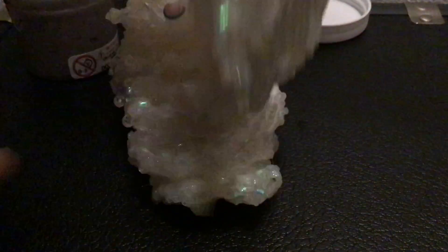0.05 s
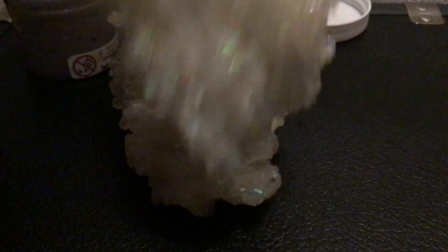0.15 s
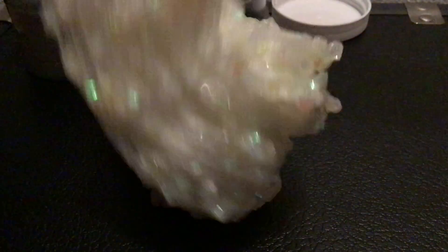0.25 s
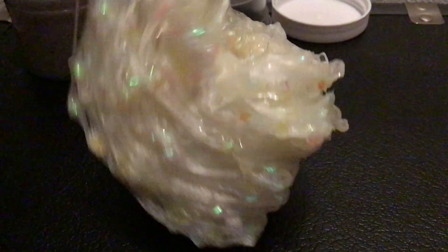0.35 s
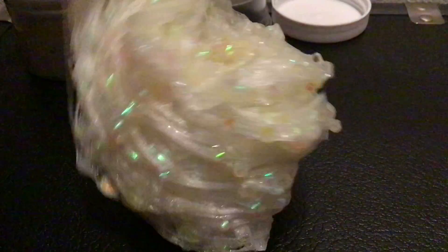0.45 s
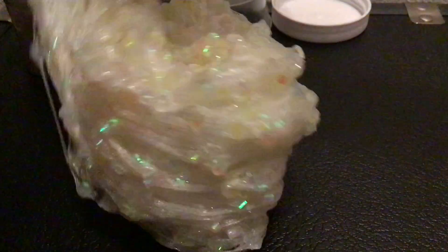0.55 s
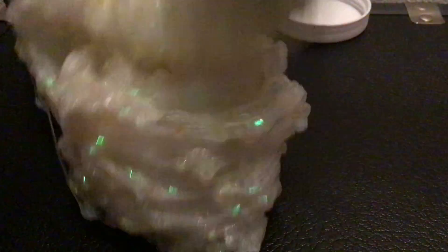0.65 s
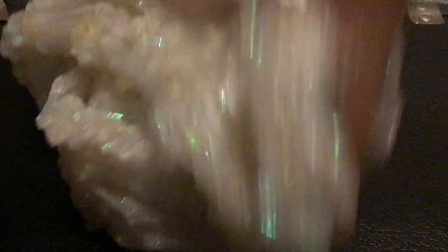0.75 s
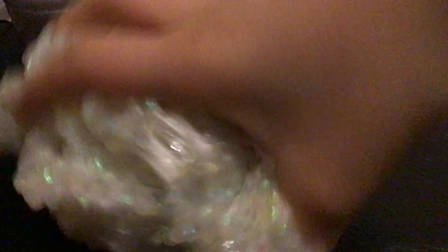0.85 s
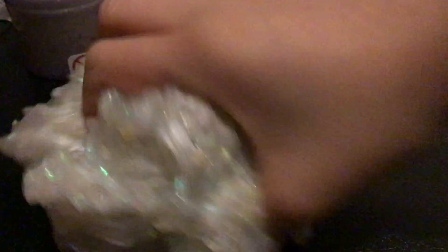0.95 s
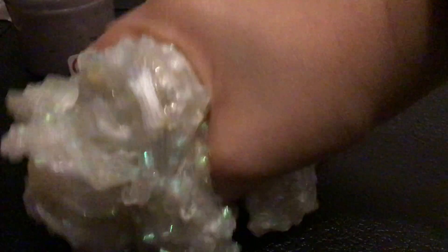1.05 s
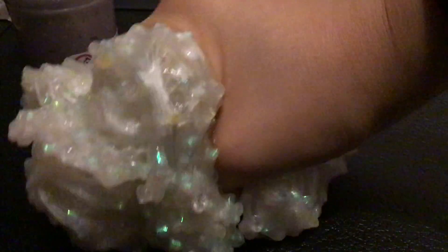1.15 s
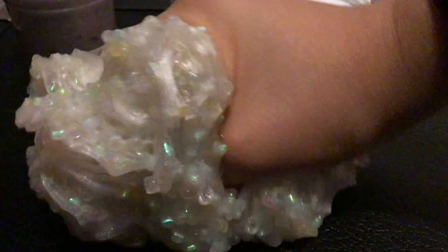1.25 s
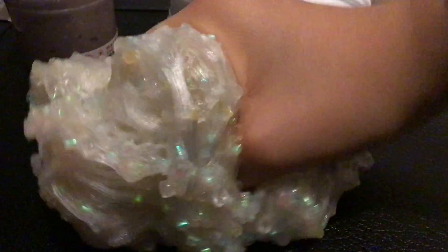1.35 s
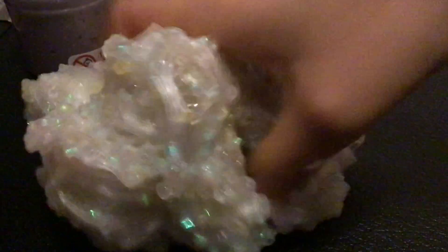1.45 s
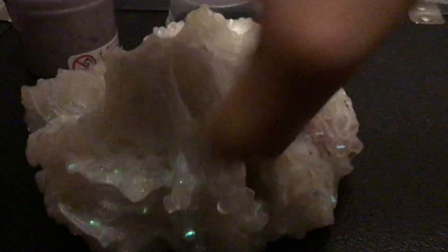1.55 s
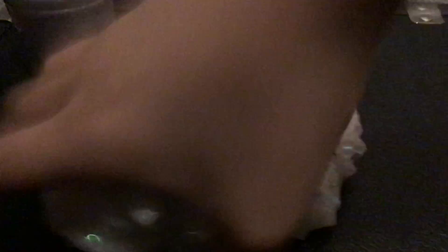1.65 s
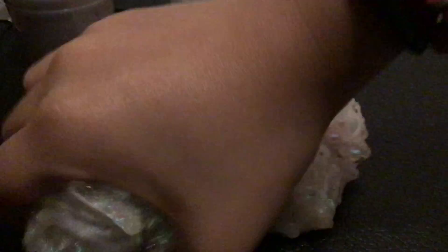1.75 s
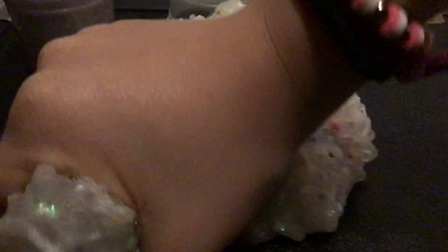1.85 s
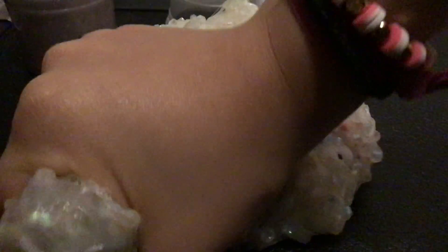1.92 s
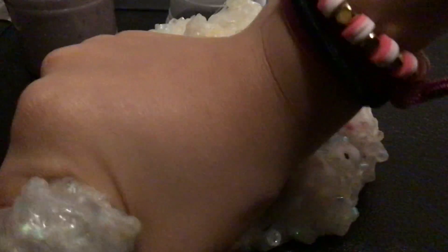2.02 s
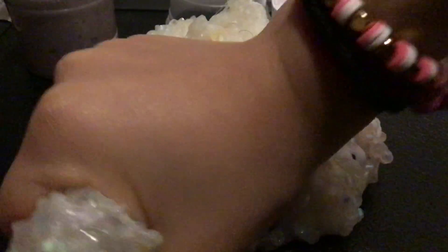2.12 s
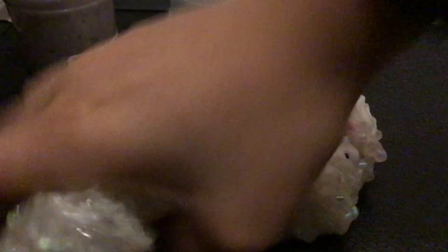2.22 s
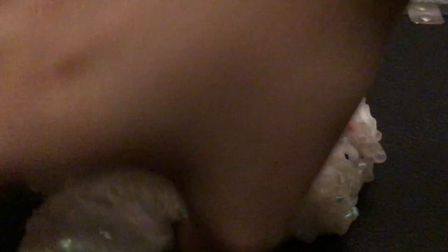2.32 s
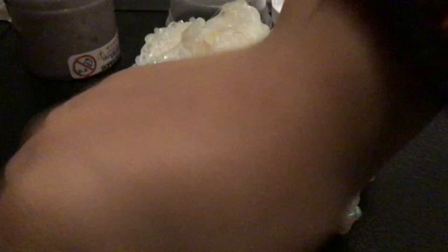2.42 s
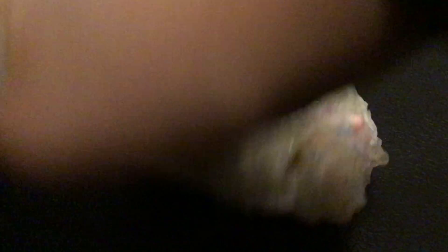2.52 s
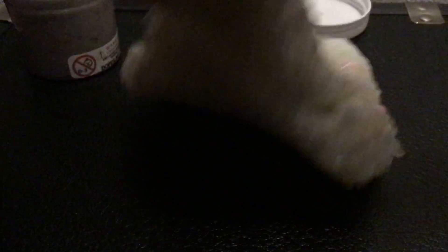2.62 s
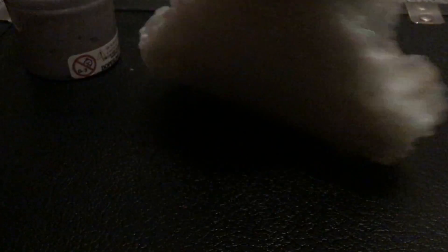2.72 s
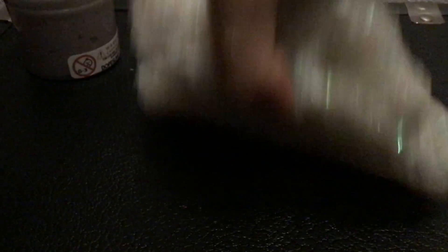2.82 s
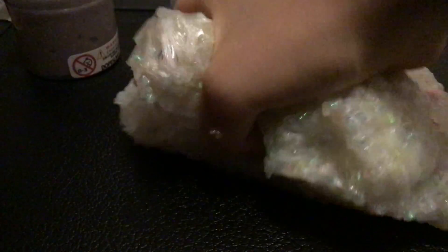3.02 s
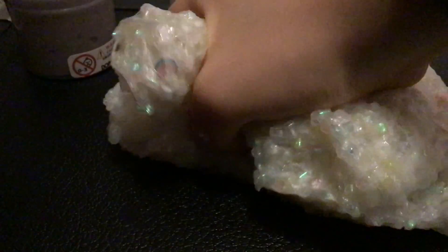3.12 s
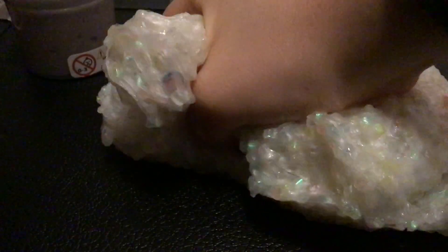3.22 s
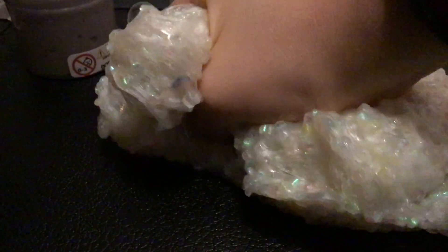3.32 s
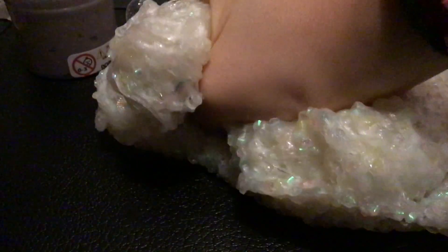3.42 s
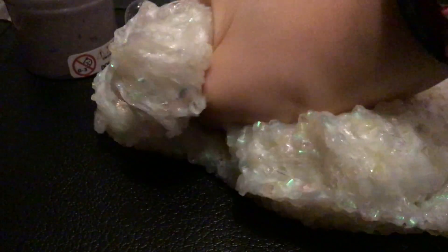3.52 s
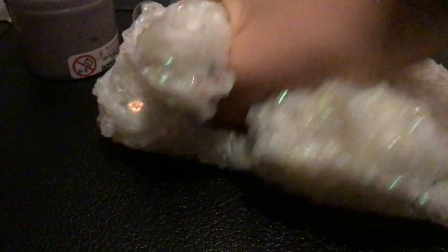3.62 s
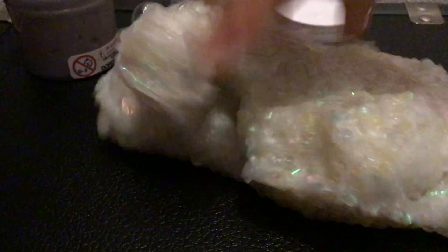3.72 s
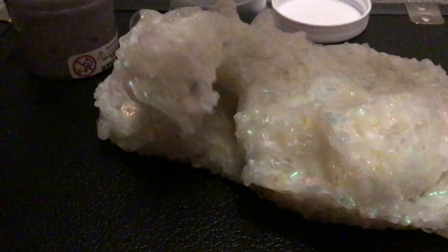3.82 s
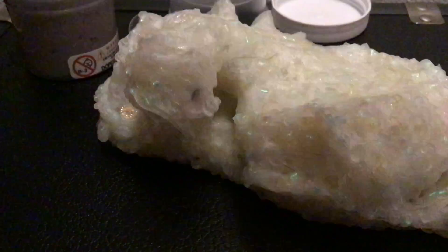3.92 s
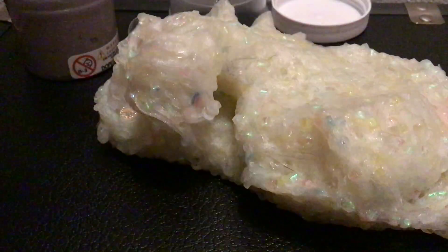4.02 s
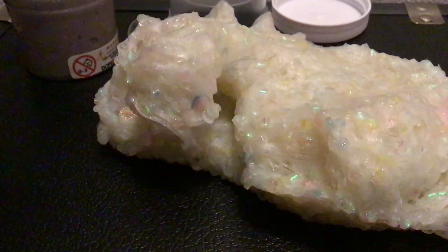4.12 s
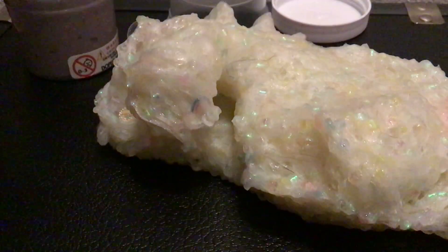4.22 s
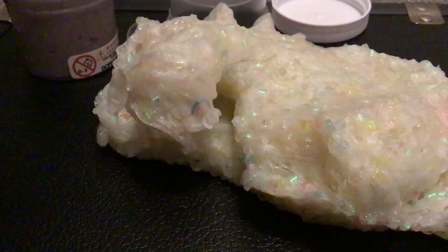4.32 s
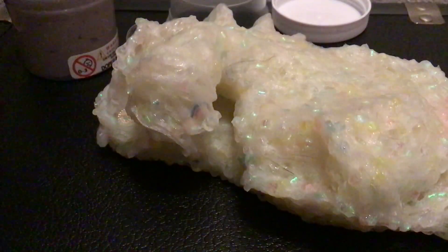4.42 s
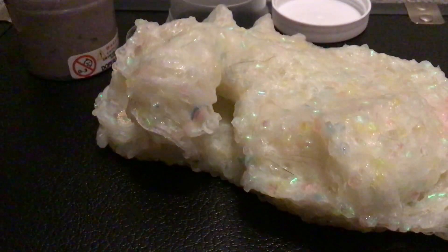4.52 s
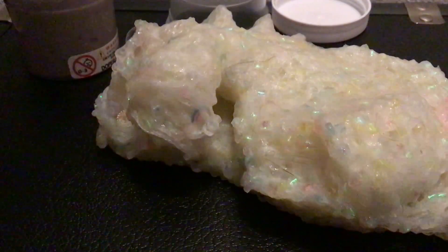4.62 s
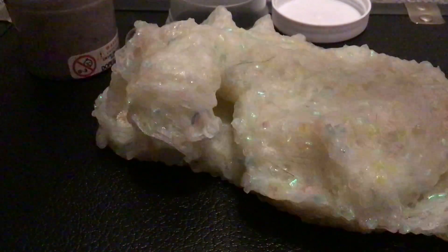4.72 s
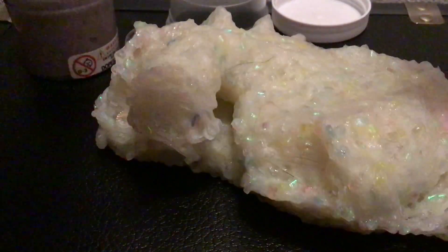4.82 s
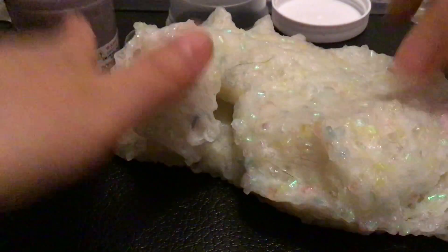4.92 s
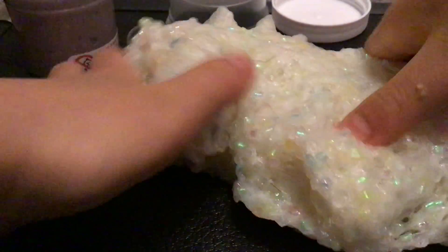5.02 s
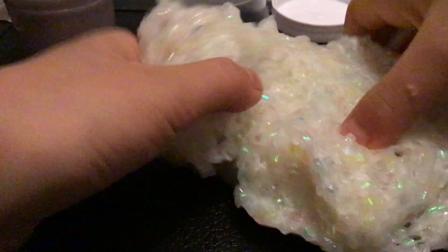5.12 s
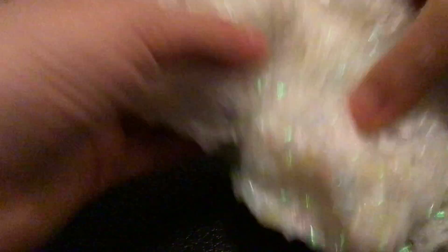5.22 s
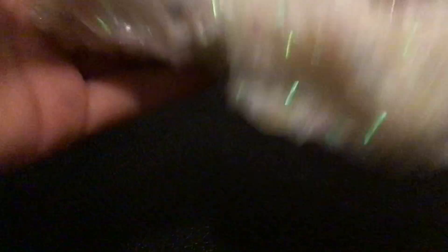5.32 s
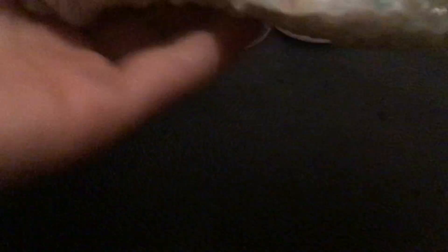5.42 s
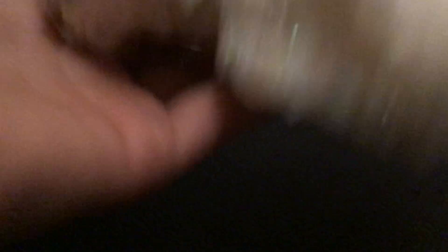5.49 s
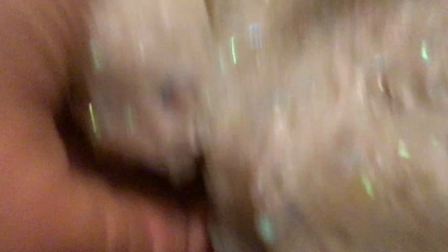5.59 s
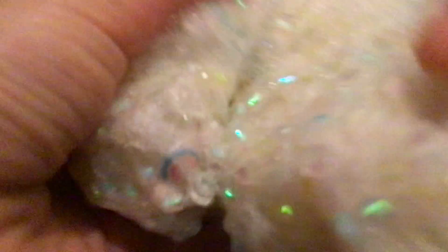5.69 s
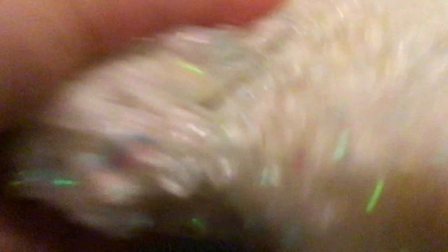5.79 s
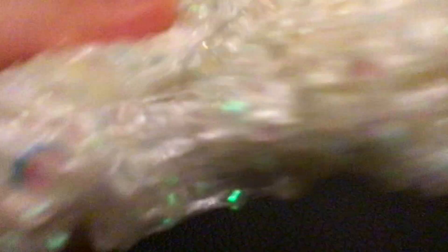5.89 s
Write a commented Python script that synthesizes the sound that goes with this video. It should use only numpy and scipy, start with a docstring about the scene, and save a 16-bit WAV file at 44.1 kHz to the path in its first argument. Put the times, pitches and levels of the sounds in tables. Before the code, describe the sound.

Hands work bead-filled slime on a table, very near the microphone. A few faint ticks lead to two strong bursts of popping and crackling with hard thumps, then another slap and thinning crackles. A short scuffing knock ends the pressing; the slime rests almost silently, then soft thumps and scattered bright pops return. Little room sound, steady low hum.

```python
"""A bead-filled slime is kneaded by hand on a table top, close to a phone microphone.
Its air pockets pop as coloured noise bursts; tearing films and tiny bubbles crackle as spiky filtered noise.
Slides hiss as denser noise, and small ringing bubbles and leaking air are short sines.
Slaps thud as tones gliding down, since the table's bending waves arrive treble first; presses and slides
drive its resonances with noise. A short room answer follows the slime, over a quiet, steady room hum."""
import sys
import numpy as np
from scipy import signal
from scipy.fft import rfft, irfft, next_fast_len
from scipy.io import wavfile

SR = 44100
rng = np.random.default_rng(int(sys.argv[2]) if len(sys.argv) > 2 else 0)


def unload_wav(signal):
    """Save mono or channel-first audio to the path in sys.argv[1] as 16-bit WAV at rate SR, clipped to [-1, 1]."""
    wavfile.write(
        sys.argv[1],
        SR,
        np.round(np.clip(np.atleast_2d(signal).T, -1, 1) * 32767).astype(np.int16),
    )


N = 262395  # length [samples]


def amp(db):
    """A level in dB as a linear gain."""
    return 10 ** (np.asarray(db) / 20)


def unit(x):
    """The signal scaled to rms 1."""
    return x / np.sqrt(np.mean(x ** 2) + 1e-20)


def along(points, hz):
    """A curve through (frequency, value) points, straight on a log frequency axis."""
    f, v = np.transpose(points)
    return np.interp(np.log(hz + 1), np.log(f + 1), v)


def filtered(x, response):
    """The signal shaped by a complex response of frequency."""
    size = next_fast_len(N + SR // 2)  # room for ringing past the end
    spectrum = rfft(x, size) * response(np.fft.rfftfreq(size, 1 / SR))
    return irfft(spectrum, size)[..., :N]


def modes(rows):
    """The causal response of a few resonances, added with alternating sign."""
    def response(f):
        total = 0
        for k, (centre, width, db) in enumerate(rows):
            damping = 1j * f * width
            total = total + (-1) ** k * amp(db) * damping / (centre * centre - f * f + damping)
        return total
    return response


def spiky(count, spread_db, life):
    """Noise of rms 1 made of overlapping bursts of scattered size, each decaying by 1/e in life [s]."""
    sizes = np.clip(rng.standard_normal(count), -3, 2)
    starts = np.bincount(rng.integers(N, size=count), amp(spread_db * sizes), N)
    envelope = signal.lfilter([1], [1, -np.exp(-1 / (life * SR))], starts)
    return unit(envelope * rng.standard_normal(N))


# Colour of the room hum: (frequency [Hz], relative level per Hz [dB])
HUM_COLOUR = [(15, -43.5), (25, -5.5), (53, 8.5), (82, 5.5), (270, -17.5), (405, -23), (641, -20.5),
              (863, -35), (1190, -36), (2480, -31.5), (3920, -41), (5140, -32.5), (6560, -39.5),
              (14800, -47.5), (16000, -44)]
HUM_DB = -59.5  # rms level


def hum():
    """The steady background of the room: noise of a fixed colour."""
    noise = filtered(rng.standard_normal(N), lambda hz: amp(along(HUM_COLOUR, hz)))
    return amp(HUM_DB) * unit(noise)


# Decay of the room: (frequency [Hz], time to fall 60 dB [s])
ROOM_DECAY = [(200, 0.055), (2000, 0.04), (12000, 0.031)]


def room(x):
    """A short answer from nearby surfaces: a noise tail in which each frequency dies at its own speed."""
    hz, t, z = signal.stft(rng.standard_normal(SR // 4), SR, nperseg=128)
    decay = amp(-60 * t / along(ROOM_DECAY, hz)[:, None])
    tail = signal.istft(z * decay, SR, nperseg=128)[1]
    late = np.pad(x, (60, 0))  # delay [samples]
    return signal.fftconvolve(late, tail / np.linalg.norm(tail))[:N]


# Strength of the kneading: (time [s], crackle level [dB], its treble against it [dB],
# push on the table [dB], rubbing against the push [dB])
KNEADING = [(0, -90, -23, -60, -8), (.12, -75, -13, -65, -8), (.35, -79, -14, -70.5, -11.5),
            (.77, -78.5, -20.5, -74, -12), (.86, -65, -27, -74, -9), (.95, -48.5, -21, -36.5, -7),
            (1.03, -47, -13, -47.5, -24), (1.08, -43.5, -7.5, -46.5, 1.5), (1.14, -48.5, -5.5, -48, -16),
            (1.24, -52, -3, -54.5, -12), (1.3, -61.5, -6, -59.5, -8), (1.38, -71.5, -4.5, -70, -3),
            (1.48, -52, -9.5, -58, -19), (1.6, -94, -6, -50, -16), (1.68, -85.5, -6, -65, -18),
            (1.72, -48, -7.5, -47.5, -5), (1.77, -40.5, -19, -34.5, -7.5), (1.84, -45.5, 1, -49, -11),
            (1.9, -44.5, 3.5, -47, -11), (2.0, -48, 2.5, -53.5, -3), (2.1, -60, -4.5, -74.5, 0),
            (2.21, -70, -9, -83, 2), (2.284, -47, -13.5, -41, -8), (2.42, -82, -12.5, -59.5, -27),
            (2.476, -40.5, -17, -39, -24), (2.55, -45.5, -10, -45, -14), (2.63, -58, 0, -64.5, -4),
            (2.84, -62.5, -6, -68.5, -7), (2.92, -53.5, -7.5, -51, -22), (3.08, -51.5, -4.5, -51.5, -8),
            (3.23, -53.5, 0, -55, -21), (3.35, -57, 1.5, -50, -21), (3.49, -60.5, -13, -61.5, -10.5),
            (3.62, -80, -2, -65, -19), (3.75, -60.5, -5.5, -52, -13), (3.85, -83, -3, -69, -18),
            (4.2, -83, -5, -75, -12), (4.7, -78, -0.5, -70, -14), (4.88, -94, -8, -74, -16),
            (5.04, -68.5, -21.5, -71, -11), (5.17, -54, -15, -50, -16), (5.25, -47.5, -11, -52, -23),
            (5.34, -69.5, 2, -64.5, -8), (5.6, -67.5, 4.5, -69, -6), (5.82, -63, -3, -68, 0.5),
            (5.95, -59, 7, -59, 2)]
CRACKLE, TREBLE, PUSH, RUB = 1, 2, 3, 4  # columns


def kneading(column):
    """How hard the hands work: one column of the kneading as a gain for every sample."""
    rows = np.array(KNEADING)
    return amp(np.interp(np.arange(N) / SR, rows[:, 0], rows[:, column]))


# Drags of the slime and slides of a hand: (start [s], full [s], stop [s], fade [s], hiss level [dB],
# treble hiss level [dB], rumble level [dB], knocking level [dB], rubbing level [dB])
SLIDE_MOVES = [(-.05, 0, 0.047, 0.052, -63.5, -71.5, -69, -53, -51.5),
               (1.402, 1.5, 1.56, 0.028, -50, -54.5, -35.5, -41.5, -55),
               (2.225, 2.253, 2.325, 0.036, -47, -56, -36.5, -43, -55),
               (2.67, 2.7, 2.74, .04, -61.5, -61.5, -75, -74, -61),
               (3.653, 3.698, 3.772, 0.056, -48, -50.5, -29.5, -40.5, -57.5),
               (4.272, 4.391, 4.51, 0.071, -73, -69, -66, -77, -86),
               (4.924, 4.945, 5.02, 0.023, -73, -126, -68, -56, -57),
               (5.077, 5.155, 5.14, 0.031, -53, -67.5, -35, -40.5, -76),
               (5.19, 5.231, 5.31, 0.02, -51, -57.5, -30.5, -37, -57),
               (5.843, 5.915, 5.95, .03, -50, -46, -67, -59, -51.5)]
HISS, TREBLE_HISS, KNOCKING, RUBBING = 4, 5, 7, 8  # columns
TOUCH_S = 0.012  # contact is made within this time
START_UNDER_DB, FADE_DB = 15.5, 28.5  # swell from this far below full; loss over one fade time


def sliding(column):
    """Each slide touches, swells, holds and fades: one level column as a gain."""
    t, gain = np.arange(N) / SR, np.zeros(N)
    for row in SLIDE_MOVES:
        start, full, stop, fade = row[:4]
        swell_db = START_UNDER_DB * np.minimum(t - full, 0) / max(full - start, 0.005)
        fade_db = FADE_DB * np.maximum(t - stop, 0) / fade
        touch = np.clip((t - start) / TOUCH_S, 0, 1)
        gain += touch * amp(row[column] + swell_db - fade_db)
    return gain


RUMBLE_UNDER_DB, RUMBLE_T60 = 23.5, 0.32  # start below full [dB]; time to fall 60 dB after the stop [s]


def rumbling():
    """The table's lowest mode builds up until a slide stops, then rings out: its level as a gain."""
    t, gain = np.arange(N) / SR, np.zeros(N)
    for start, full, stop, fade, hiss_db, treble_db, db, *_ in SLIDE_MOVES:
        build_db = RUMBLE_UNDER_DB * np.minimum(t - stop, 0) / (stop - start)
        ring_db = 60 * np.maximum(t - stop, 0) / RUMBLE_T60
        gain += amp(db + build_db - ring_db) * (t > start)
    return gain


# Table modes, lowest first: (centre [Hz], width [Hz], relative level [dB])
# The lowest and the top one are levelled alone, so only the middle two balance by the last column.
TABLE_MODES = [(67.5, 19, 0), (147.9, 44, 0.5), (283, 150, -3.5), (607, 310, 0)]
RUMBLE_DB = -2.5  # lowest mode against the knocking, while kneading


def table():
    """Drags and presses jolt the table: its lowest mode rumbles, the next knock, the top answers rubbing."""
    lowest, middle, top = modes(TABLE_MODES[:1]), modes(TABLE_MODES[1:3]), modes(TABLE_MODES[3:])
    rumble = filtered(spiky(count=1500, spread_db=0.5, life=0.0079), lambda hz: lowest(hz) ** 2)
    knock = filtered(spiky(count=2000, spread_db=1.5, life=0.00098),
                     lambda hz: middle(hz) / (1 + 1j * hz / 400) ** 2)  # softened above 400 Hz
    rub = filtered(spiky(count=12000, spread_db=1.5, life=0.0017), lambda hz: top(hz) ** 2)
    push = kneading(PUSH)
    # pushes and slides add their power
    rumble_gain = np.hypot(amp(RUMBLE_DB) * push, rumbling())
    knock_gain = np.hypot(push, sliding(KNOCKING))
    rub_gain = np.hypot(kneading(RUB) * push, sliding(RUBBING))
    return rumble_gain * unit(rumble) + knock_gain * unit(knock) + rub_gain * unit(rub)


# Slaps on the table: (time [s], level before the rise [dB], first pitch [Hz], last pitch [Hz],
# glide time constant [s], time to fall 60 dB [s])
SLAPS = [(0.94, -11, 412, 66, 0.0037, 0.13), (0.9546, -21.5, 370, 67.4, 0.014, 0.042),
         (1.08, -22.5, 310, 100, 0.0073, 0.031), (1.608, -29, 338, 70, 0.005, 0.1),
         (1.735, -6, 154, 89, 0.017, 0.047), (1.9075, -20, 317, 82, 0.0035, 0.055),
         (1.9605, -7, 528, 65, 0.0016, 0.07), (2.461, -7, 860, 100, 0.0017, 0.04),
         (2.4705, -12, 253, 80, 0.015, 0.029), (2.479, -21.5, 305, 80, 0.0087, 0.065),
         (2.5617, -10, 550, 64, .0022, .07), (2.899, -38.5, 242, 90, .015, 0.157),
         (3.701, -28, 300, 97, 0.009, .18), (3.802, -26, 235, 66.8, .0058, 0.2),
         (5.048, -26.5, 224, 71, 0.0084, 0.38), (5.155, -21.5, 214, 86, 0.014, 0.11),
         (5.238, -27.5, 272, 117.5, 0.017, 0.18)]
RISE_CYCLES = 0.45  # rise time constant, in cycles of the first pitch


def thuds():
    """Bending waves in the table: high ones travel faster, so each slap is a sine gliding down."""
    out, t = np.zeros(N + SR), np.arange(SR // 4) / SR
    for s, db, first_hz, last_hz, glide, t60 in SLAPS:
        turns = last_hz * t + (first_hz - last_hz) * glide * (1 - np.exp(-t / glide))
        rise = 1 - np.exp(-t * first_hz / RISE_CYCLES)
        thud = amp(db - 60 * t / t60) * rise * np.sin(2 * np.pi * turns)
        out[round(s * SR):][:len(t)] -= thud
    return out[:N]


# Colour of tiny bubbles and treble hiss: (frequency [Hz], relative level per Hz [dB])
FIZZ_COLOUR = [(2500, -37), (5000, 2.5), (8000, 1.5), (12000, -2.5), (16000, -3), (18000, -2.5)]


def fizzy(x):
    """The bright colour shared by the fizzing bubbles and the treble of the slides."""
    return unit(filtered(x, lambda hz: amp(along(FIZZ_COLOUR, hz))))


# Colour of the sliding hiss: (frequency [Hz], relative level per Hz [dB])
SCUFF_COLOUR = [(530, -57), (900, -2.5), (2600, 0), (3640, -6.5), (4970, -5.5), (6480, -36), (8000, -21),
                (10400, -10), (17600, -120)]


def slides():
    """Sliding contact is a dense, nearly smooth hiss that fades fast when the grip holds."""
    def grit():
        return spiky(count=20000, spread_db=2.5, life=0.00028)
    hiss = unit(filtered(grit(), lambda hz: amp(along(SCUFF_COLOUR, hz))))
    return sliding(HISS) * hiss + sliding(TREBLE_HISS) * fizzy(grit())


# Ringing bubbles and faint squeaks of air leaking from the resting slime: (time [s],
# level before the rise [dB], pitch [Hz], rise time constant [s], time to fall 60 dB [s])
SMALL_TONES = [(2.0175, -26, 4000, 0.0004, .012), (3.574, -36, 2550, 0.00059, 0.016),
               (3.925, -62, 5250, 0.022, 0.12), (3.955, -78, 6800, 0.023, .1),
               (3.986, -63, 6050, 0.018, .12), (4.01, -69, 6800, 0.022, 0.14),
               (4.056, -66, 6900, 0.023, 0.1), (4.07, -72.5, 5000, 0.018, 0.095),
               (4.086, -73.5, 7150, 0.011, 0.056), (4.1, -68, 4600, .015, 0.14),
               (4.105, -72, 7800, 0.01, .07), (4.16, -69, 4550, 0.014, .12), (4.17, -63, 5050, .015, 0.087),
               (4.301, -64, 2950, 0.02, 0.14)]


def tones():
    """Ringing bubbles and leaking air: short sines whose pitch drifts a little."""
    out, t = np.zeros(N + SR), np.arange(SR // 8) / SR
    for s, db, hz, rise, t60 in SMALL_TONES:
        drift = np.cumsum(rng.standard_normal(len(t))) * 0.08  # wandering phase [rad]
        envelope = amp(db - 60 * t / t60) * (1 - np.exp(-t / rise))
        out[round(s * SR):][:len(t)] += envelope * np.sin(2 * np.pi * hz * t + drift)
    return out[:N]


# Colour of the tearing films: (frequency [Hz], relative level per Hz [dB])
FILM_COLOUR = [(500, -40.5), (900, -12), (1450, 1), (2000, -5), (2600, -2.5), (3500, -6), (5400, -10.5),
               (7000, -16), (11000, -14.5), (17000, -25.5)]


def crackle():
    """Films tear and tiny bubbles fizz, as loud as the slime is worked."""
    shared = spiky(count=3000, spread_db=14.0, life=0.0014)  # one tear sounds in both ranges
    tears = shared + 0.8 * spiky(count=8000, spread_db=6.0, life=0.00076)
    bubbles = shared + 0.8 * spiky(count=8000, spread_db=9.0, life=0.0006)
    films = unit(filtered(tears, lambda hz: amp(along(FILM_COLOUR, hz))))
    return kneading(CRACKLE) * (films + kneading(TREBLE) * fizzy(bubbles))


SMALL_OVER_DB, SMALL_SPREAD_DB = 9, 1.5  # weakest peak over the crackle; scale of the random excess
SMALL_HZ, SMALL_HZ_SPREAD = 3230, 0.36  # median pocket [Hz]; log-normal scatter
SMALL_SNAP_DB, SMALL_PUFF_DB, COLOUR_SPREAD_DB = -10, -10.5, 8.5  # means against the pocket; scatter
SMALL_T60, SMALL_T60_SPREAD = 0.0035, 0.88  # median time to fall 60 dB [s]; log-normal scatter


def small_pops(count):
    """Lesser pockets burst at random, as strong as the kneading of the moment: rows like the loud pops."""
    s = N / SR * rng.random(count)
    excess = np.minimum(rng.exponential(size=count), 2)
    z = rng.standard_normal((count, 4))
    crackle_db = np.interp(s, *np.transpose(KNEADING)[:2])
    db = crackle_db + SMALL_OVER_DB + SMALL_SPREAD_DB * excess
    hz = SMALL_HZ * np.exp(SMALL_HZ_SPREAD * z[:, 0])
    snap_db = SMALL_SNAP_DB + COLOUR_SPREAD_DB * z[:, 1]
    puff_db = SMALL_PUFF_DB + COLOUR_SPREAD_DB * z[:, 2]
    t60 = SMALL_T60 * np.exp(SMALL_T60_SPREAD * z[:, 3])
    return np.transpose([s + 0.001, db, hz, snap_db, puff_db, t60])


# Loud bursting pockets: (time [s], pocket peak level [dB], pocket pitch [Hz],
# film snap against the pocket [dB], puff against the pocket [dB], time to fall 60 dB [s])
LOUD_POPS = [(0.2814, -52, 2980, -12, -18, 0.0102), (0.3433, -46, 2300, -13, -12, 0.0052),
             (0.349, -56, 4260, -4, -19, 0.0026), (0.423, -57, 3790, 8, -15, 0.0019),
             (0.445, -44.5, 2800, -7, -29, 0.0093), (0.4553, -61, 2540, -2, -13, 0.012),
             (0.5124, -59, 2670, -24, -14, 0.0026), (0.5336, -57, 3140, 0, -17, 0.0023),
             (0.5669, -56, 2820, -13, -7, 0.008), (0.841, -52, 2740, -9.5, -5, 0.0046),
             (0.8802, -47.5, 3140, -10, -25, 0.0041), (0.898, -34, 3030, -9, -22, 0.0024),
             (0.9101, -31.5, 3300, 0.5, -14, 0.0027), (0.9391, -28, 2500, -12.5, 1, 0.0033),
             (0.9586, -28, 3910, 0.5, -5, 0.0014), (0.9655, -32, 3770, -8.5, -10, 0.0046),
             (0.9709, -40, 3090, -9.5, -17, 0.0018), (0.9984, -32, 4050, -7.5, -21, 0.0041),
             (1.0377, -29.5, 3070, -13.5, -13, 0.0102), (1.0486, -21, 3680, -12.5, -9.5, 0.0101),
             (1.0654, -27.5, 3010, -7.5, -6, 0.012), (1.0746, -17, 2260, -19, -16, 0.009),
             (1.0917, -27, 4170, 4.5, -12, 0.01), (1.111, -23.5, 2280, -23.5, -4, 0.0077),
             (1.1426, -33.5, 2530, -9, -16, 0.0036), (1.1465, -34, 2780, 6.5, -11, 0.0028),
             (1.1594, -36, 4120, 11.5, -18, 0.0043), (1.1677, -34, 2700, -15, -14, 0.012),
             (1.1784, -30.5, 2120, -4, 5, 0.002), (1.183, -30.5, 2640, 3.5, -22, 0.0093),
             (1.196, -29, 2560, -8, -13, 0.0035), (1.21, -15.5, 3180, -16, -13, 0.005),
             (1.226, -39, 2770, -12, -21, 0.0057), (1.2553, -40, 2750, -1, -9, 0.0058),
             (1.2834, -23, 2780, -4, -18, 0.0046), (1.3261, -41, 2260, -3.5, -8, 0.0079),
             (1.349, -47.5, 3730, 2, -17, 0.0016), (1.4104, -39.5, 3610, -11, -28, 0.0046),
             (1.6035, -53, 2190, -17, 3, 0.0014), (1.6078, -59, 1680, -23, 5.5, 0.0023),
             (1.6847, -58, 3610, 11, -1, 0.0049), (1.7013, -35, 3590, 3, -5.5, 0.0016),
             (1.7372, -29, 2610, -8.5, -4, 0.0029), (1.7457, -32.5, 2630, 5, -12, 0.0018),
             (1.7584, -15.5, 3300, -19, -31, 0.0015), (1.7694, -27.5, 2600, -16.5, 1.5, 0.012),
             (1.7855, -28.5, 4030, -9.5, -16, 0.0045), (1.7997, -15, 4300, -16.5, -35, 0.0016),
             (1.806, -24.5, 2080, -8, -21, 0.0043), (1.8148, -25, 2760, -6, -8, 0.012),
             (1.821, -28.5, 2290, 2.5, 1, 0.0026), (1.829, -20, 3280, -7, -11, 0.0051),
             (1.8512, -14, 3300, -13.5, -22, 0.0032), (1.854, -21, 4460, -6.5, -12, 0.0084),
             (1.8776, -14, 5270, -5.5, -22, 0.0053), (1.8888, -18.5, 2800, -21.5, -15, 0.002),
             (1.8932, -23.5, 3760, -4, -23, 0.0088), (1.895, -31, 3830, 4, -22, 0.012),
             (1.909, -13.5, 3490, 7.5, -36, 0.0018), (1.9235, -30, 3670, -2.5, -25, 0.0045),
             (1.9375, -26, 3080, 2.5, -23, 0.0094), (1.9621, -17.5, 3600, 12, -1, 0.0058),
             (1.968, -21, 3360, 7, -13, 0.012), (1.9928, -9, 4130, -3.5, -17.5, 0.0032),
             (1.9975, -25.5, 4350, -3, -4, 0.0044), (2.015, -40.5, 3730, 5.5, -21, 0.0024),
             (2.0175, -14.5, 3100, -21, -26, 0.0082), (2.04, -27.5, 5360, 13.5, -26, 0.0031),
             (2.0753, -35.5, 4220, 0, -29, 0.0044), (2.0812, -41.5, 4880, 11.5, -24, 0.0039),
             (2.0925, -30.5, 3490, -8, -9, 0.0057), (2.097, -33.5, 3440, -6, -10, 0.0086),
             (2.1051, -43, 4200, 3.5, -18, 0.0034), (2.1177, -34.5, 1900, -16, -10, 0.0037),
             (2.1382, -43, 3880, -3, -29, 0.0053), (2.1572, -52, 3290, 16, 2, 0.0017),
             (2.167, -48.5, 3360, -1.5, -14, 0.0048), (2.184, -42, 3870, -16, -21, 0.0012),
             (2.2482, -31.5, 3270, -4.5, -20, 0.0017), (2.252, -28.5, 2790, -19.5, -19, 0.0041),
             (2.261, -29.5, 3070, -14.5, -26, 0.0069), (2.2937, -26.5, 3760, -18.5, -20, 0.0058),
             (2.299, -20, 3740, -16, -24, 0.0036), (2.3026, -22, 4750, -16.5, -32, 0.002),
             (2.4285, -50.5, 3250, -12.5, -23, 0.0049), (2.439, -44, 3460, -3.5, -20, 0.0053),
             (2.4542, -27, 3020, -6, -10, 0.0029), (2.4596, -20.5, 1780, -10.5, 5, 0.0094),
             (2.472, -28, 2660, -14, -1, 0.0082), (2.4926, -32, 3870, -3.5, -10, 0.0015),
             (2.504, -27, 3540, -22, -13, 0.0019), (2.519, -30, 3980, 7.5, -23, 0.0016),
             (2.5624, -12, 5600, 4.5, -20, 0.0019), (2.6114, -33.5, 4250, -4.5, -20, 0.0022),
             (2.6237, -35.5, 3230, -3.5, -21, 0.004), (2.6729, -30, 2620, -15.5, -20, 0.0024),
             (2.759, -39, 3900, 3, -21, 0.0028), (2.771, -32.5, 3000, -16, -12, 0.0044),
             (2.7847, -44, 2800, -1, -1, 0.012), (2.8146, -42, 2760, -15, -10, 0.0019),
             (2.8406, -43, 3610, 14.5, -18, 0.0017), (2.8587, -40, 3510, -5.5, -20, 0.0039),
             (2.8683, -30, 3160, -20, -14, 0.0029), (2.88, -37.5, 2970, -8, -7, 0.0078),
             (2.8864, -31, 3830, -4, -29, 0.0017), (2.8945, -39, 2450, 7, -22, 0.0018),
             (2.9009, -22, 3100, -0.5, -33, 0.0031), (2.9065, -38.5, 2950, 7, -22, 0.0017),
             (2.917, -34.5, 3580, 6, -24, 0.0012), (2.941, -18, 2830, 0.5, -15.5, 0.0051),
             (2.9636, -37, 4330, -6, -39, 0.0054), (2.9804, -38, 3030, -3.5, -21, 0.012),
             (3.0101, -40, 3320, 3.5, -14, 0.012), (3.044, -28, 2260, -4, -22, 0.004),
             (3.055, -27, 3580, -3.5, -26, 0.0018), (3.0645, -41, 2820, 10, -12, 0.0069),
             (3.0704, -30.5, 1950, -10, -27, 0.0103), (3.0749, -28.5, 2360, -11, -30, 0.0049),
             (3.0943, -34.5, 3160, 6.5, -13, 0.0078), (3.1274, -25.5, 2600, -21, -13, 0.0033),
             (3.1326, -42, 3520, -15, -14, 0.0058), (3.1463, -40, 3230, 2, -17, 0.0107),
             (3.1625, -36, 2880, 14, -4, 0.0022), (3.1848, -40, 3040, 7.5, -21, 0.0098),
             (3.199, -45.5, 4030, 1, -18, 0.0067), (3.2075, -25, 4600, -0.5, -22, 0.0019),
             (3.2297, -42, 3650, 6, -24, 0.0062), (3.2367, -27, 5060, 8.5, -14, 0.0018),
             (3.2396, -30, 4200, 11, -10, 0.0082), (3.2434, -44.5, 3310, 12.5, -13, 0.0024),
             (3.2655, -37, 4250, 12.5, -23, 0.0051), (3.3188, -43.5, 3620, 4.5, 3, 0.0099),
             (3.337, -39.5, 3620, 6, -18, 0.0017), (3.3646, -26.5, 2800, 1, -7, 0.0056),
             (3.3828, -38.5, 2520, 2, 2.5, 0.0042), (3.4263, -41, 4600, 1, -18, 0.0019),
             (3.4472, -40.5, 2150, -6, -22, 0.012), (3.4616, -41, 3090, 12.5, -18, 0.0042),
             (3.4745, -47, 3250, 18, -7, 0.0052), (3.496, -47, 4010, 9, -20, 0.0079),
             (3.505, -50, 2520, 6, -15, 0.0056), (3.5315, -44, 3470, -1, -10, 0.007),
             (3.5744, -44.5, 2580, -16, -19, 0.012), (3.5862, -59, 3320, -9, -13, 0.002),
             (3.6874, -27, 4270, -3, -28, 0.012), (3.7005, -29.5, 3180, -17, -2, 0.006),
             (3.7036, -25.5, 2200, -12, -12, 0.0046), (3.818, -43.5, 3100, -8, -9, 0.0068),
             (3.9114, -59, 4010, 8.5, -12, 0.0026), (4.0003, -50, 4640, 1.5, -23.5, 0.0022),
             (4.0251, -55, 2890, -18.5, -12, 0.0091), (4.3502, -46, 3850, -6, -24, 0.0041),
             (4.917, -54, 2066, -8, -8, 0.007), (4.9488, -54, 2810, -16, 11, 0.012),
             (4.9555, -48.5, 1905, -17, -6, 0.0065), (5.0313, -57, 2420, 18, -6, 0.0025),
             (5.0508, -44, 2100, -5, -29, 0.0083), (5.0542, -49, 2300, -9, -12, 0.0027),
             (5.069, -50, 3200, 9, -14, 0.0036), (5.1185, -43, 2360, -12, 1, 0.0103),
             (5.1363, -48, 3020, 4, -20, 0.0037), (5.1445, -43, 2350, -1.5, 5, 0.0074),
             (5.1657, -30.5, 3900, -3, -27, 0.0032), (5.2051, -26, 3530, -9, -28, 0.0019),
             (5.2106, -28, 3660, -3.5, -23, 0.0019), (5.2345, -38.5, 2130, 6, -13, 0.0109),
             (5.2414, -30, 2830, -0.5, -24, 0.0071), (5.2565, -32, 3110, 2.5, -20, 0.012),
             (5.3159, -27.5, 2680, -22, -23, 0.0041), (5.3565, -41.5, 4570, -7, -6, 0.0054),
             (5.3608, -29.5, 3450, -7, -12, 0.0053), (5.4178, -49, 4752, 12, -26, 0.0042),
             (5.4527, -57, 4580, -3.5, -14, 0.0018), (5.5208, -37.5, 3930, -7, -19, 0.0022),
             (5.537, -29, 4270, -1.5, -22, 0.0034), (5.561, -48, 3830, -9.5, -19, 0.0071),
             (5.5755, -36, 3600, -6, -10, 0.0022), (5.6139, -47, 3414, -6, -15, 0.0024),
             (5.6223, -32.5, 2880, -3, -23, 0.0022), (5.6419, -24.5, 4271, -14, -20, 0.0027),
             (5.646, -27.5, 3300, -13, -27, 0.0036), (5.6541, -48, 4500, 2, -21, 0.0084),
             (5.6855, -49, 3220, 7, -19, 0.0022), (5.6976, -56, 4240, 7, -7, 0.0024),
             (5.7025, -39.5, 2440, -10, -6.5, 0.0026), (5.7174, -49.5, 4410, -3, -15, 0.0023),
             (5.7492, -43, 2590, -8.5, -23, 0.0032), (5.755, -43, 4780, -18, -18, 0.0063),
             (5.7671, -38, 4430, 14.5, -17, 0.0016), (5.7995, -43, 3730, 10.5, -18, 0.0022),
             (5.8122, -45, 3790, 19, -19, 0.002), (5.816, -27, 2901, -8, -6.5, 0.0016),
             (5.8263, -49, 3420, 7, -22, 0.0084), (5.844, -41, 3530, 11, -20, 0.0016),
             (5.8589, -36, 3070, 0.5, -12, 0.0069), (5.8626, -45.5, 4820, 15, -7, 0.0037),
             (5.8667, -42, 3100, 4.5, -5, 0.0046), (5.8811, -37, 3070, -4.5, -7, 0.0037),
             (5.9204, -33.5, 3410, -0.5, -16, 0.0027), (5.9326, -23, 4520, -3.5, -17, 0.0024)]


def pops():
    """Each burst of air is coloured by its pocket, the film snaps above it and a low puff escapes."""
    out, t = np.zeros(N + SR), np.arange(SR // 42) / SR
    f = np.fft.rfftfreq(len(t), 1 / SR)

    def resonate(x, hz, width):
        """The burst through a doubled resonance, scaled to peak 1."""
        y = irfft(rfft(x) * modes([(hz, width, 0)])(f) ** 2, len(t))
        return y / np.abs(y).max()

    for s, db, hz, snap_db, puff_db, t60 in [*small_pops(count=250), *LOUD_POPS]:
        envelope = amp(-60 * t / t60) * (1 - np.exp(-t / 0.00044))
        burst = envelope * rng.standard_normal(len(t))
        burst[10] += 2.2 * rng.choice([-1, 1])  # the instant the film gives way
        pocket = resonate(burst, hz, 1.5 * hz)
        snap = resonate(burst, 10000, 12000)
        puff = resonate(burst, 900, 1300)
        start = round((s - 0.0003) * SR)  # the film gives way just after the start
        out[start:][:len(t)] += amp(db) * (pocket + amp(snap_db) * snap + amp(puff_db) * puff)
    return out[:N]


def scene():
    """Slime with its room answer, table and hum."""
    slime = pops() + tones() + crackle() + slides()
    return (slime + amp(-10.5) * room(slime) + thuds() + table() + hum())[None]


DULL_HZ, TOP_HZ = 15900, 17157  # 14 dB duller above the first, silent from the second


def record(dry):
    """Deep bass is cut below 35 Hz, the top is 14 dB duller above 15.9 kHz and silent from 17.2 kHz."""
    def response(hz):
        bass = (1j * hz / 35 / (1 + 1j * hz / 35)) ** 4  # four low cuts at 35 Hz
        return bass * amp(-14 * (hz > DULL_HZ)) * (hz < TOP_HZ)
    return filtered(dry, response)


dry = scene()
out = record(dry)
unload_wav(out)
```